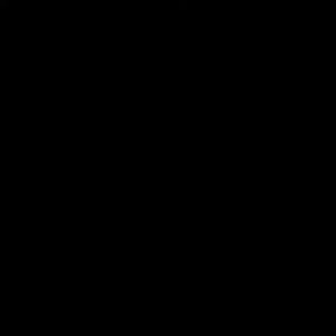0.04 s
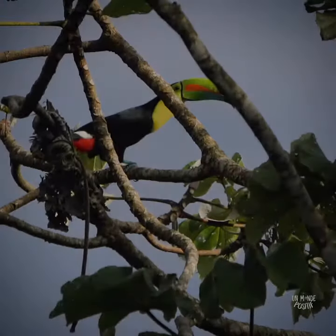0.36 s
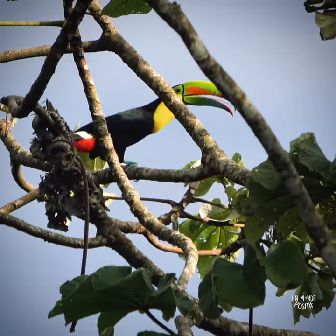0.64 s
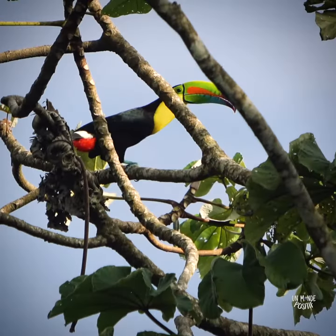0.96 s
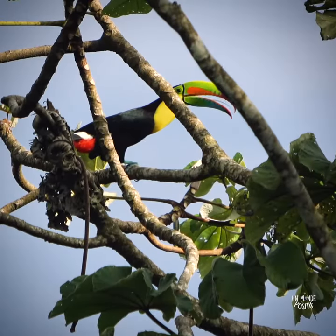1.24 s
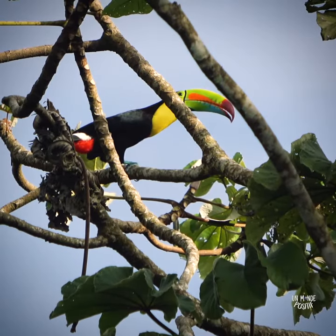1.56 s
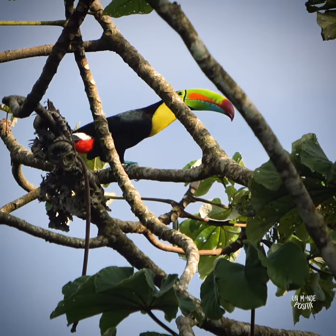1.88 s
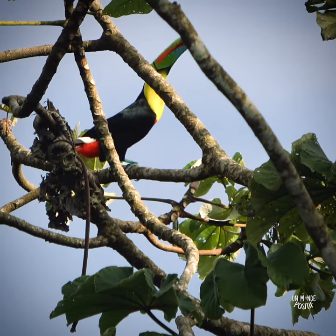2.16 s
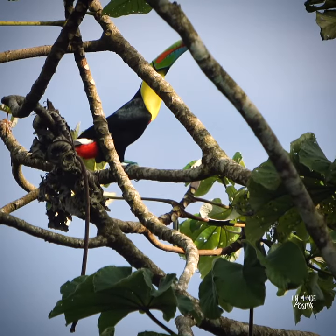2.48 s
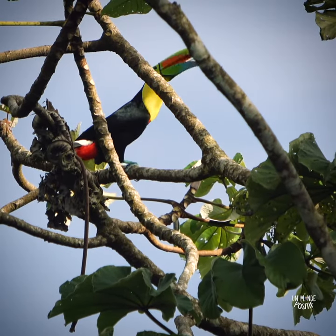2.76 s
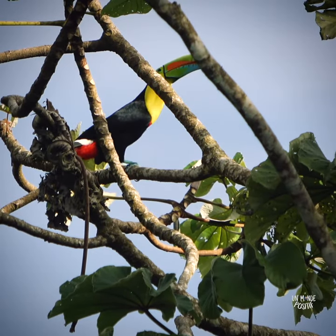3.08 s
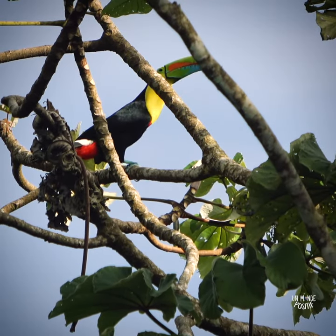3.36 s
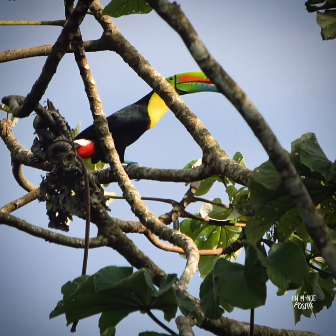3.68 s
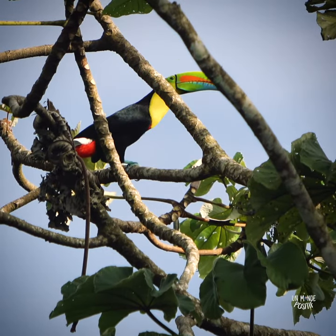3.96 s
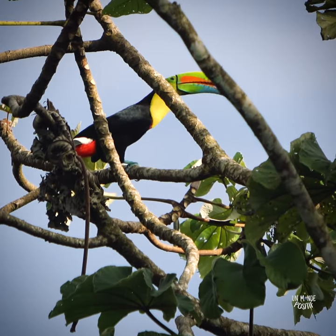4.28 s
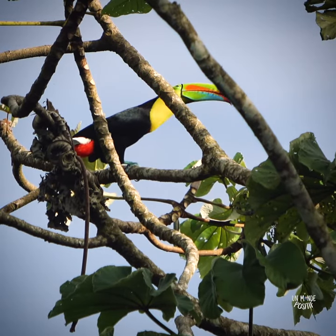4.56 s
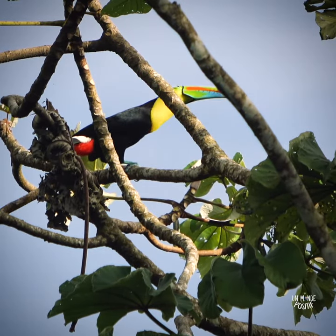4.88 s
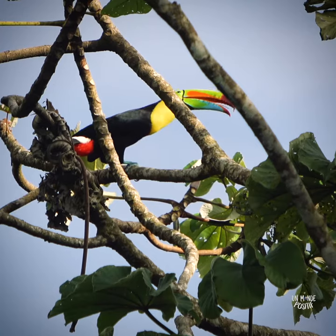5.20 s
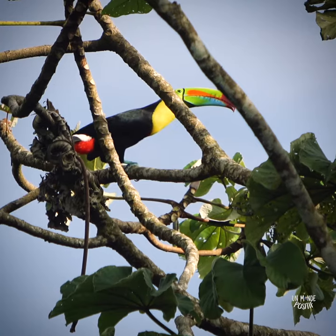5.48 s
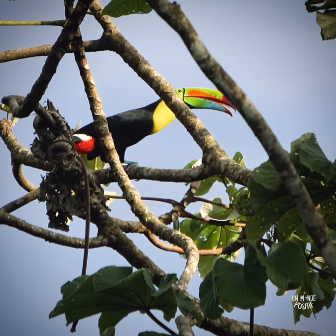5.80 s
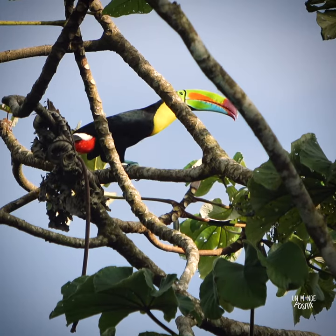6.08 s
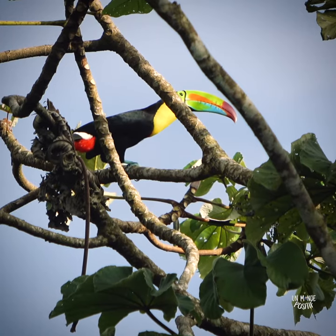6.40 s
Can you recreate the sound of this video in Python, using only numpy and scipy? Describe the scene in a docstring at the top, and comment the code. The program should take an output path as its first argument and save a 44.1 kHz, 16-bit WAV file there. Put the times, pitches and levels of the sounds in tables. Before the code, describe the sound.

A toucan gives eight harsh, rattling croaks at a steady pace over hissing forest insects and a faint distant rumble.

```python
"""A forest bed opens: hissing insects, soft air and thin far tones. A few small ticks sound nearby.
From about 0.6 s a toucan croaks eight times. Each croak is a quick rattle of tone pips from the syrinx
that grow louder and higher, turn rough and end in two dry snaps as it slaps shut; the trees send back
a faint echo. Halfway through, a low rumble swells far away, peaks near 4.7 s and sinks back under
the last two croaks."""
import sys
import numpy as np
from scipy import signal
from scipy.fft import rfft, irfft, next_fast_len
from scipy.io import wavfile

SR = 44100
rng = np.random.default_rng(int(sys.argv[2]) if len(sys.argv) > 2 else 0)


def transcribe(signal):
    """Save signal, clipped to [-1, 1], as a 16-bit WAV file at the path in sys.argv[1]."""
    frames = np.atleast_2d(signal).T
    limited = np.clip(frames, -1, 1)
    pcm = np.round(limited * 32767).astype(np.int16)
    wavfile.write(sys.argv[1], SR, pcm)


N = 288414
TIME = np.arange(N) / SR

# stereo image of the noise beds, wider in the treble: (frequency [Hz], left-right correlation [0..1])
STEREO_IMAGE = [(60, .9995), (250, .993), (1000, .997), (2200, .999), (5000, .9992), (6300, .99),
                (8000, .7), (11000, .38), (16000, .33)]
# colours of the air, the rumble and the insects: (frequency [Hz], relative density [dB])
AIR_COLOUR = [(100, 2), (240, 1), (400, -4), (700, -6.5), (1300, -12), (2500, -9.5), (8000, -21),
              (16000, -18.5)]
RUMBLE_COLOUR = [(32, 0), (44, 2), (62, -1), (80, 0), (104, -8), (125, -13), (155, -29.5), (220, -48)]
INSECT_COLOUR = [(2000, -53), (2600, -16.5), (2900, -7.5), (3300, -0.5), (4100, -1.5), (5100, -2),
                 (5800, -9), (6600, -16.5), (7500, -27.5), (9500, -30)]
# fader curve of the distant rumble: (time [s], level [dB])
RUMBLE_SWELL = [(.15, -57.5), (2.9, -58), (3.6, -47.5), (4.05, -42.5), (4.7, -41), (5.1, -48),
                (6.54, -49.5)]
# faint far tones: (start [s], end [s], pitch [Hz], start level [dB], end level [dB])
DISTANT_TONES = [(0.1, 0.33, 1202, -43, -66.5), (0.102, 0.28, 791, -53, -75.5),
                 (4.177, 5.05, 507, -67, -62), (4.7, 5.043, 835, -65.5, -63)]
# small ticks in the tree: (time [s], dull level [dB], bright level [dB], decay by 60 dB [s])
TICK_CUES = [(0.522, -37, -73.5, 0.027), (0.564, -43, -62, 0.051), (0.812, -38, -66, 0.032),
             (0.983, -35, -50, 0.029), (1.634, -47.5, -58, 0.071), (3.209, -49, -38.5, 0.022),
             (3.226, -58, -47, 0.31), (5.213, -31, -37, 0.0038), (5.517, -46, -59, 0.23)]
# colours of a tick's two layers: (frequency [Hz], relative density [dB])
DULL_COLOUR = [(250, -1), (480, -1), (800, -11), (1300, -15), (2000, -11.5), (4000, -34)]
BRIGHT_COLOUR = [(1000, 2), (4000, 1), (9000, -4.5), (15000, -13)]
# echoes off branches and far trees: (delay [s], level [dB])
ECHO_TAPS = [(.0044, -12.5), (0.0095, -15), (0.276, -43)]

# throat and bill resonances, for a snap's crack and its low knock: (pitch [Hz], width [Hz], level [dB])
CRACK_MODES = [(1780, 220, 0), (2795, 250, -11), (4080, 250, -21), (4930, 1000, -30)]
KNOCK_MODES = [(555, 304, 1), (1090, 1200, -24)]
# dry throat clicks just before a croak: (time [s], crack level [dB], knock level [dB])
THROAT_CLICKS = [(2.0671, -26, -38), (2.8197, -23.5, -36)]
# every croak breaks up in this pattern: (lead on the first snap [s], crack level [dB], knock level [dB])
SPUTTER_SLAPS = [(.043, -19.5, -35), (.0305, -16.5, -30.5), (.0177, -23.5, -36.5)]
# closing snaps: (time [s], first level [dB], gap [s], second level [dB], sputter trim [dB])
SNAP_CUES = [(0.7392, -13, 0.02, -17, 0), (1.516, -12.5, 0.021, -17.5, 1), (2.2522, -8.5, 0.019, -12, 1.5),
             (3.007, -11, .0247, -18.5, 1), (3.7549, -13, .0186, -13, 1), (4.5724, -11.5, .0214, -18, 1.5),
             (5.2991, -12, 0.018, -13.5, 1.5), (6.0549, -14.5, 0.022, -15, 1.5)]

# overtones let through by throat and bill: (frequency [Hz], level against the fundamental [dB])
OVERTONE_COLOUR = [(2700, -38), (3020, -13), (3300, -12.5), (3700, -22), (4700, -19), (6000, -34.5),
                   (6900, -37), (7700, -47), (8300, -37), (9400, -46.5), (13000, -64)]
# colour of the rasp in a pip: (frequency [Hz], relative density [dB])
RASP_COLOUR = [(1500, -5), (2100, 1), (2500, -9), (3100, 6.5), (5300, -1), (6800, -13), (7700, -11),
               (8400, -23), (9500, -24), (14000, -45)]
# the croaks: (start [s], crest time [s], level the rattle swells to [dB], crest level [dB],
#   crest pitch [Hz], fade per pip [dB], double-time lead on the crest [s], open-bill treble gain [dB])
CROAK_CUES = [(.5765, 0.6978, -14, -14, 2016, 3.5, .022, 4),
              (1.340, 1.463, -13.5, -10.5, 1945, 5.5, .028, 1.5),
              (2.1013, 2.1916, -15.5, -11.8, 1810, 5.5, 0.013, 7),
              (2.8448, 2.9563, -13, -5.8, 1965, 7.5, 0.009, 0.5),
              (3.601, 3.714, -11.5, -13, 1973, 2.5, 0.01, 1.5),
              (4.4083, 4.520, -13, -8.5, 2004, 4.5, .008, -1),
              (5.161, 5.2566, -14, -15, 1940, 4, .052, 3.5),
              (5.904, 6.0152, -14, -14.5, 1997, 4.5, 0.048, -1.5)]
# beats on which the voice falters: (time [s], level drop [dB])
WEAK_BEATS = [(.577, 8), (1.340, 5), (3.623, 7), (4.430, 21), (5.160, 7.5), (5.203, 12), (5.948, 10)]
# extra pips as a croak stumbles into its beat: (time [s], level [dB], pitch [Hz])
STUMBLE_PIPS = [(0.587, -23.5, 1590), (5.8929, -23.5, 1734)]

BOUNCE_S, BOUNCE_DB = .001949, -7.5  # one reflection inside the long windpipe
PIP_MS, CREST_MS, FADE_MS = 5.3, 4.9, 2.9  # pip lengths before, at and after the crest


def from_db(db):
    """Decibels to gain."""
    return 10 ** (np.asarray(db) / 20)


def unit_rms(x):
    """Scale to unit power."""
    return x / np.sqrt(np.mean(x ** 2) + 1e-20)


def at_hz(points, hz):
    """Read a table on a log-frequency axis."""
    known_hz, values = np.transpose(points)
    return np.interp(np.log(hz + 1), np.log(known_hz), values)


def drift(rate_hz):
    """A random modulator of unit power, gliding from value to value."""
    knots = rng.standard_normal(int(rate_hz * N / SR) + 2)
    return unit_rms(np.interp(TIME * rate_hz, np.arange(len(knots)), knots))


def noise(colour):
    """Stereo noise of the given colour, rolled off at both ends and wider in the treble."""
    size = next_fast_len(N)
    hz = np.arange(size // 2 + 1) * SR / size
    rolloff = 1 / (1 + (colour[0][0] / (hz + 1)) ** 4) / (1 + (hz / colour[-1][0] / 1.2) ** 8)
    alike = np.clip(at_hz(STEREO_IMAGE, hz), 0, 1)
    mid, side = rfft(rng.standard_normal((2, size))) * from_db(at_hz(colour, hz)) * rolloff
    left_right = np.sqrt(1 + alike) * mid + np.sqrt(1 - alike) * side * [[1], [-1]]
    return unit_rms(irfft(left_right, size)[:, :N])


def ring(clicks, hz, width_hz):
    """A resonator: a unit click sets off a damped sine of height 1."""
    r, w = np.exp(-np.pi * width_hz / SR), 2 * np.pi * hz / SR
    return signal.lfilter([1, -r * np.cos(w)], [1, -2 * r * np.cos(w), r * r], clicks + 1e-18)


def band(x, low_hz, high_hz, order=2):
    """Butterworth band-pass."""
    sos = signal.butter(order, [low_hz, min(high_hz, .45 * SR)], "band", fs=SR, output="sos")
    return signal.sosfilt(sos, x)


def delayed(x, seconds):
    """A single delay tap."""
    return np.interp(TIME - seconds, TIME, x, left=0)


def far_tones(waver=.005, flutter_db=4, fade_s=.043):
    """Thin wavering sines, barely above the air."""
    out = np.zeros(N)
    for start, end, hz, start_db, end_db in DISTANT_TONES:
        fade = np.clip(np.minimum(TIME - start, end - TIME) / fade_s, 0, 1)
        level = from_db(np.interp(TIME, [start, end], [start_db, end_db]) + flutter_db * drift(40))
        pitch = hz * (1 + waver * drift(43))
        out += fade * level * np.sin(2 * np.pi * np.cumsum(pitch) / SR)
    return out


def rumble(throb_db=1.5, drone_hz=77.4, width_hz=34, drone_db=-1, drone_follows=.73):
    """Distant throbbing low end; a narrow droning core comes forward as it swells."""
    swell_db = np.interp(TIME, *np.transpose(RUMBLE_SWELL))
    drone = unit_rms(band(rng.standard_normal(N), drone_hz - width_hz / 2, drone_hz + width_hz / 2))
    drone *= from_db(drone_db + drone_follows * (swell_db - swell_db.max()))
    level = from_db(swell_db + throb_db * drift(11))
    return level * (band(noise(RUMBLE_COLOUR), 31.4, 500, order=4) + drone)


def insects(level_db=-43, swing_db=1.7, peak_s=.55, cycle_s=2.04, shimmer_db=.9):
    """A chorus of insects merges into a shimmering hiss that slowly swells and sinks."""
    chorus_db = level_db + swing_db * np.cos(2 * np.pi * (TIME - peak_s) / cycle_s)
    return from_db(chorus_db + shimmer_db * drift(30)) * noise(INSECT_COLOUR)


def ticks():
    """Brief taps and rustles: a dull and a bright noise layer share one decay."""
    dull, bright, out = noise(DULL_COLOUR)[0], noise(BRIGHT_COLOUR)[0], np.zeros(N)
    for s, dull_db, bright_db, t60 in TICK_CUES:
        at = round(s * SR) + np.arange(SR // 4)
        decay = from_db(-60 * TIME[:len(at)] / t60)
        out[at] += (from_db(dull_db) * dull[at] + from_db(bright_db) * bright[at]) * decay
    return out


def trees(call, near_db=-14, near_t60=.21, near_hz=8000, far_db=-22, far_t60=.52, far_hz=3500, turn_hz=5):
    """Leaves scatter the call and trunks keep it lingering; as the head swings, other paths take over."""
    t = TIME[:SR]
    heading = 2 * np.pi * turn_hz * TIME + drift(40)
    out = call + sum(from_db(db) * delayed(call, s) for s, db in ECHO_TAPS)
    for share in (np.cos(heading), np.sin(heading)):
        reverb = 0
        # long paths lose their treble
        for level_db, t60, top_hz in ((near_db, near_t60, near_hz), (far_db, far_t60, far_hz)):
            wash = band(rng.standard_normal(SR), 1280, top_hz, order=1)
            tail = wash * from_db(-60 * t / t60) * (t > .003)
            reverb += from_db(level_db) * tail / np.sqrt(np.sum(tail ** 2))
        out += share * signal.fftconvolve(call, reverb)[:N]
    return out


def ending(s, first_db, gap_s, second_db, sputter_db):
    """A sputter, then two snaps, as slaps (time [s], crack level [dB], knock level [dB])."""
    for lead_s, crack_db, knock_db in SPUTTER_SLAPS:
        yield s - lead_s, crack_db + sputter_db, knock_db + sputter_db
    yield s, first_db, first_db - 22.5
    yield s + gap_s, second_db, second_db - 27


def snaps(grit_db=-6, grit_t60=.044, creak_db=-14, top_hz=5400):
    """The syrinx slaps shut; each slap rings the throat and hollow bill and bounces in the windpipe."""
    slaps = THROAT_CLICKS + [slap for cue in SNAP_CUES for slap in ending(*cue)]
    s, crack_db, knock_db = np.transpose(slaps)
    cracks, knocks, out = np.zeros((3, N))
    at = np.round(s * SR).astype(int)
    cracks[at], knocks[at] = from_db(crack_db), from_db(knock_db)
    # the air behind each slap escapes as a dying crackle of tiny clicks
    escaping = signal.lfilter([1], [1, -from_db(-60 / (grit_t60 * SR))], knocks + 1e-18)
    crackle = escaping * rng.standard_normal(N) * (rng.random(N) < .1)
    for hits, crackle_db, modes in ((cracks, grit_db, CRACK_MODES), (knocks, creak_db, KNOCK_MODES)):
        drive = hits + from_db(crackle_db) * crackle
        out += sum(from_db(db) * ring(drive, hz, width_hz) for hz, width_hz, db in modes)
    out = band(out + from_db(BOUNCE_DB + 2.5) * delayed(out, BOUNCE_S), 260, top_hz)
    return band(out, 100, 5900, order=4)  # soft tissue takes the edge off


def rattle(start, crest, rattle_db, crest_db, crest_hz, fade_db, doubling_s, throat_hz,
           beat_s=.0224, swell_db_per_s=45, low_hz=1523, climb_s=.01674, fade_beat_s=.0118, fade_hz=2039):
    """A beat swells, climbs, doubles and fades: pips (time [s], level [dB], pitch [Hz], length [ms])."""
    half_beats = np.linspace(start, crest, round(2 * (crest - start) / beat_s), endpoint=False)
    for k, s in enumerate(half_beats):
        to_crest = crest - s
        # off-beat pips only come through near the crest
        loss_db = k % 2 * min(6 * (to_crest / doubling_s) ** 6, 60)
        loss_db += sum(db for at, db in WEAK_BEATS if abs(s - at) < beat_s / 4)
        hz = low_hz + (crest_hz - low_hz) * np.exp(-to_crest / climb_s)
        pull = np.clip(loss_db / 7, 0, 1) ** 2  # a pip 7 dB down takes the pitch of the throat
        yield s, rattle_db - swell_db_per_s * to_crest - loss_db, hz + pull * (throat_hz - hz), PIP_MS
    yield crest, crest_db, crest_hz, CREST_MS
    for k in (1, 2, 3):
        yield crest + k * fade_beat_s, crest_db - k * fade_db, fade_hz, FADE_MS


def pips(sag_hz_per_ms=-6, rise_hz_per_ms=30, waver=.023, shimmer_db=2, reedy_lead_ms=.083,
         pure_db=4, uneven_db=1.5, rasp_db=-21, strain_db=2, kick_db=-9, throat_hz=1920):
    """Each opening of the syrinx lets out a short tone; overtones and rasp come just ahead of it."""
    voice, airflow, kicks = np.zeros((3, N))
    ms = np.arange(-SR // 80, SR // 80) * 1000 / SR
    jitter, shimmer = 1 + waver * drift(900), from_db(shimmer_db * drift(900))
    lag = round(BOUNCE_S * SR)
    openings = [pip for *croak, _ in CROAK_CUES for pip in rattle(*croak, throat_hz)]
    openings += [(*pip, PIP_MS) for pip in STUMBLE_PIPS]
    for s, level_db, hz, length_ms in openings:
        chance = rng.standard_normal(8)
        at = round(s * SR) + np.arange(len(ms)) - len(ms) // 2 - lag // 2
        steepness = np.where(ms < 0, 4.5, 2.4)  # hard attack, softer release
        envelope = .5 ** (np.abs(2 * ms / (.85 * length_ms)) ** steepness)
        reedy = np.interp(ms + reedy_lead_ms, ms, envelope)
        # low pips sag a little; hard-blown high ones slide upward and are nearly pure
        effort = np.clip((hz - 1600) / 400, 0, 1)
        glide = (1 - effort) * sag_hz_per_ms + effort * rise_hz_per_ms + 8 * chance[0]
        pitch = (hz + glide * ms) * jitter[at]
        phase = 2 * np.pi * (np.cumsum(pitch) / SR + chance[1])
        tone = envelope * shimmer[at] * np.sin(phase)
        tone += from_db(BOUNCE_DB) * np.roll(tone, lag)
        tone /= np.abs(tone).max()
        for k in range(2, 8):
            overtone_db = at_hz(OVERTONE_COLOUR, k * hz) - pure_db * effort * (k - 2.5)
            tone += from_db(overtone_db + uneven_db * chance[k]) * reedy * np.sin(k * phase + chance[k])
        voice[at] += from_db(level_db) * tone
        airflow[at] += from_db(level_db + strain_db * effort) * reedy
        kicks[round(s * SR)] += from_db(level_db + kick_db) * (1 - effort)
    # low pips also kick the throat into ringing above their own pitch
    voice += band(ring(kicks, throat_hz, width_hz=220), 1850, 2200)
    rasp = from_db(rasp_db) * airflow * noise(RASP_COLOUR)[0]
    voice = band(voice, 1320, 16500, order=5) + rasp
    # an open bill lets more treble out
    _, crests, *_, treble_db = np.transpose(CROAK_CUES)
    treble_gain = from_db(np.interp(TIME, crests, treble_db))
    return voice + (treble_gain - 1) * band(voice, 4000, 15700, order=1)


def scene(air_db=-54):
    """The toucan sits dead centre among the trees, over the stereo forest bed."""
    toucan = trees(pips() + snaps())
    return toucan + ticks() + insects() + rumble() + from_db(air_db) * noise(AIR_COLOUR) + far_tones()


def record(dry, start_s=.1455, cutoff_hz=15900):
    """A short silence, a 2 ms fade-in and a steep high cut on the mix."""
    opened = dry * np.clip((TIME - start_s) / .002, 0, 1)
    return signal.sosfilt(signal.ellip(10, .1, 80, cutoff_hz, fs=SR, output="sos"), opened)


dry = scene()
out = record(dry)
transcribe(out)
```